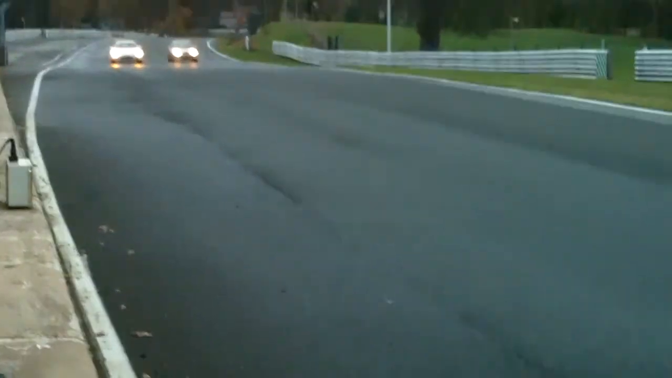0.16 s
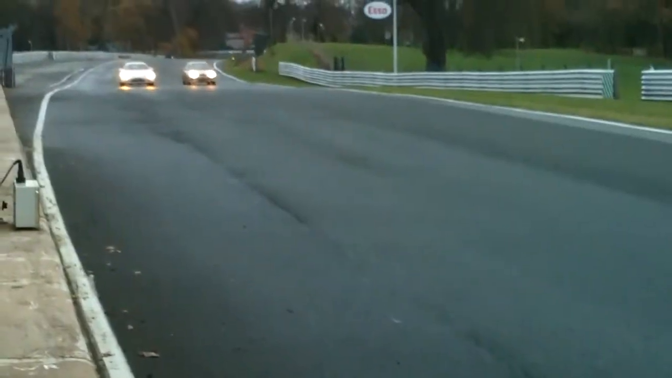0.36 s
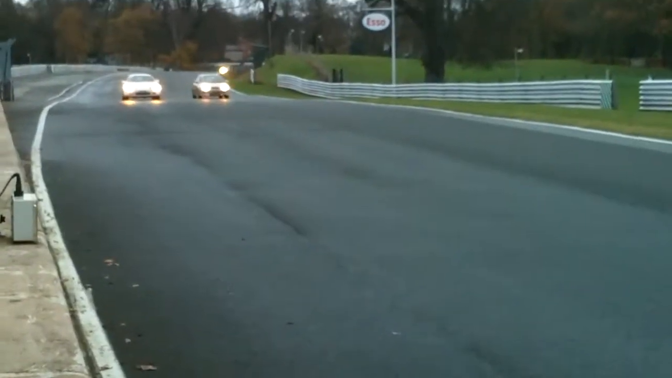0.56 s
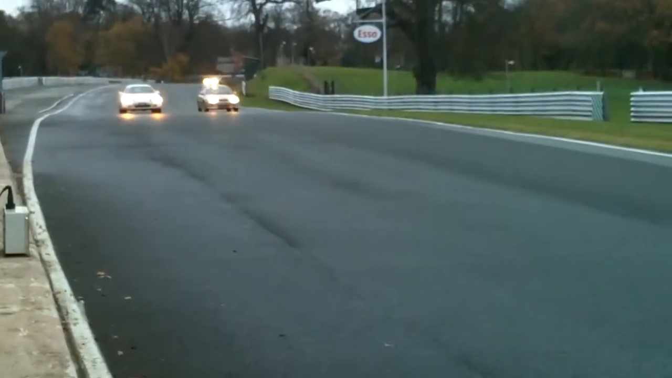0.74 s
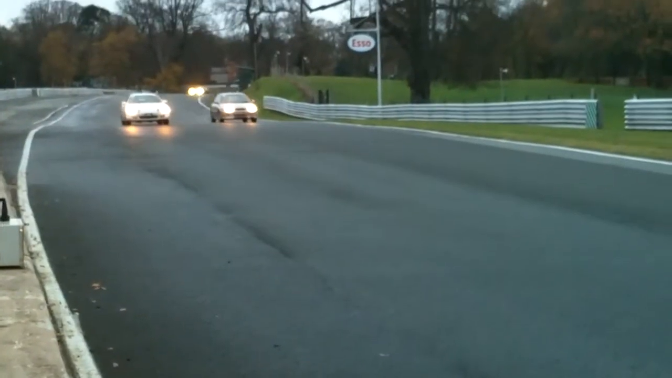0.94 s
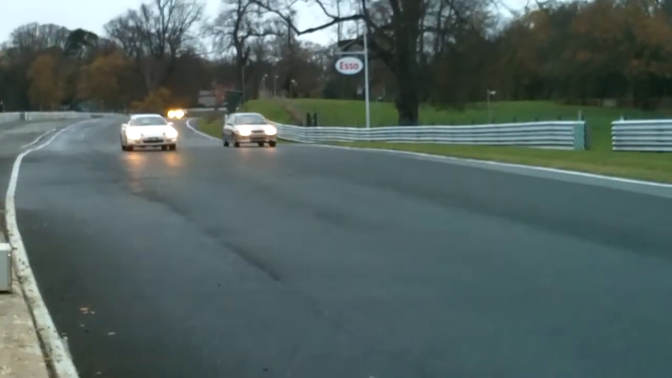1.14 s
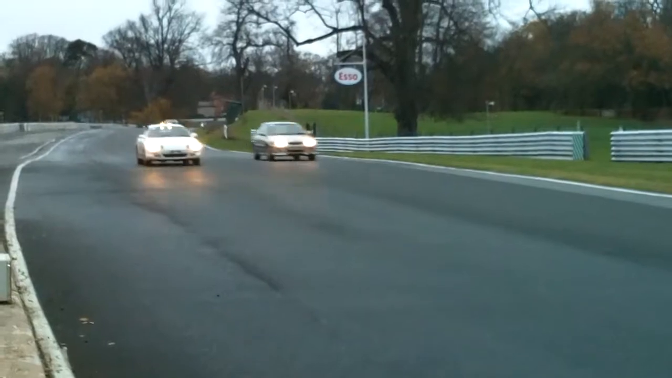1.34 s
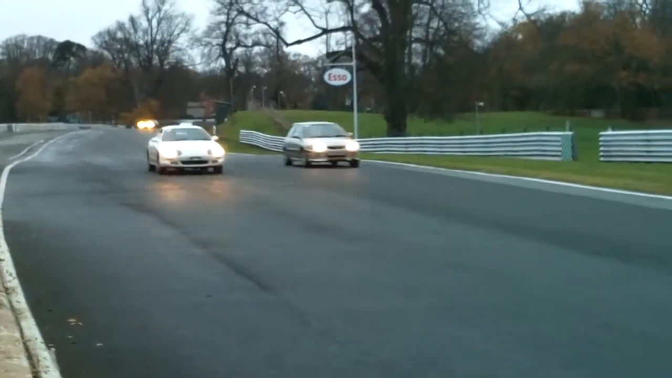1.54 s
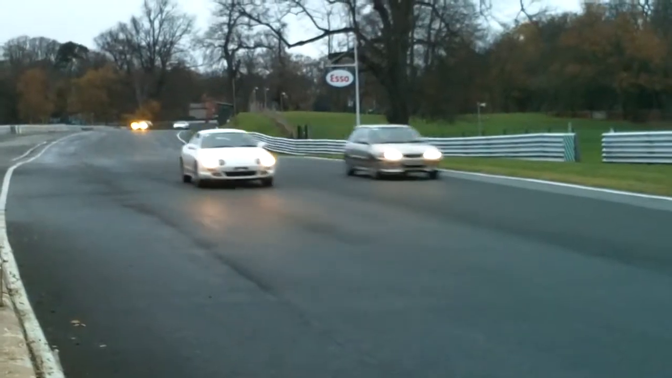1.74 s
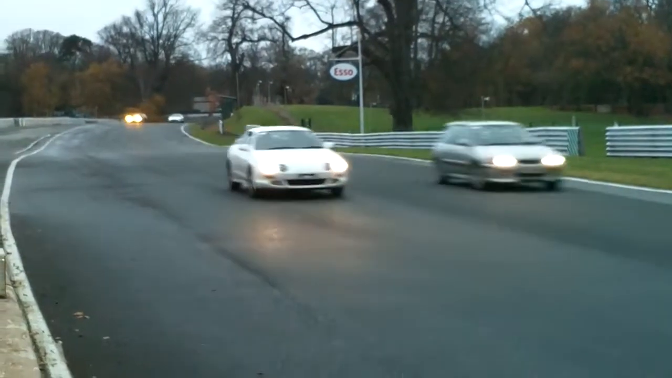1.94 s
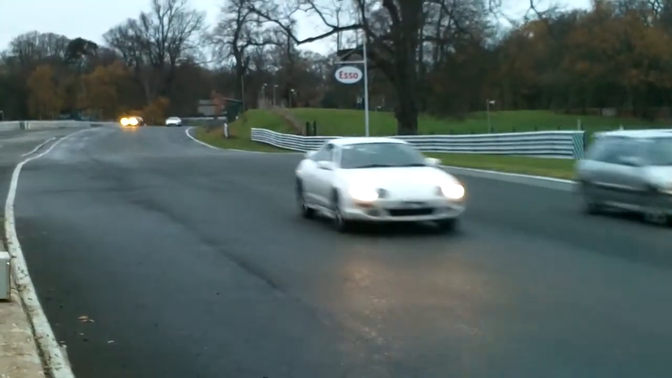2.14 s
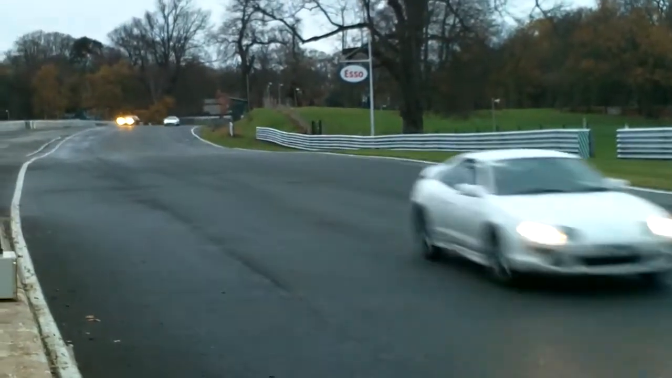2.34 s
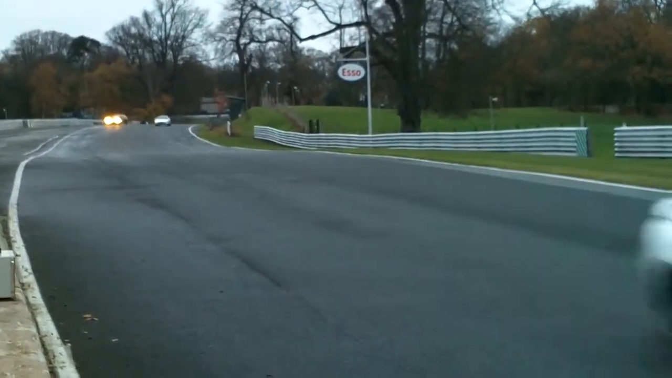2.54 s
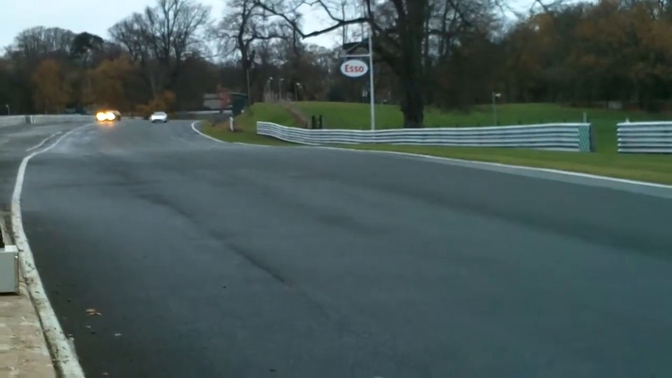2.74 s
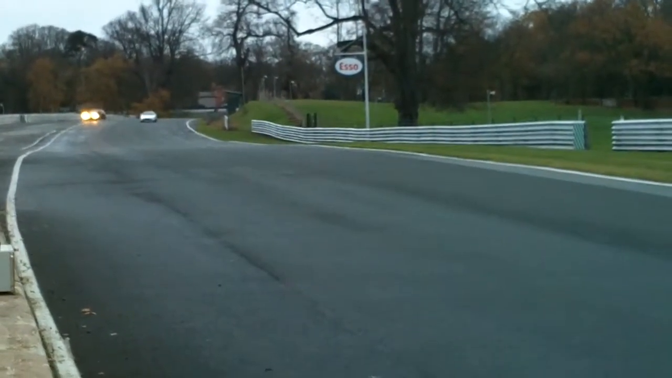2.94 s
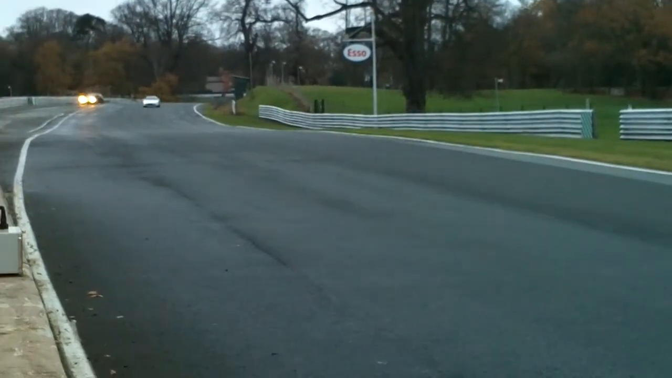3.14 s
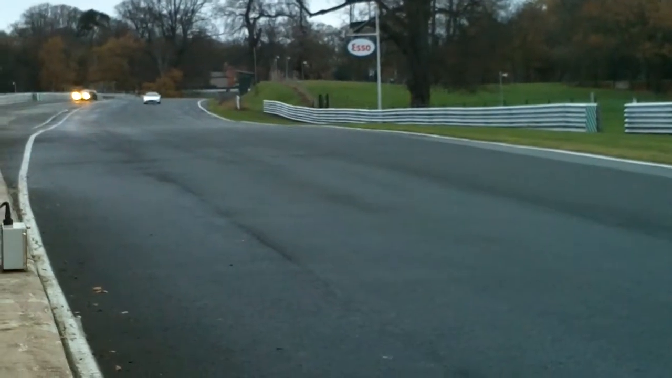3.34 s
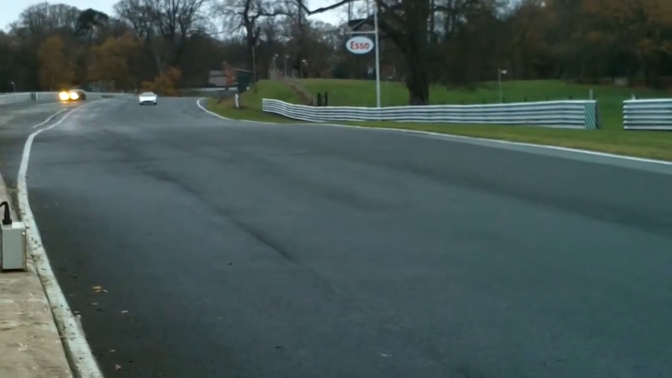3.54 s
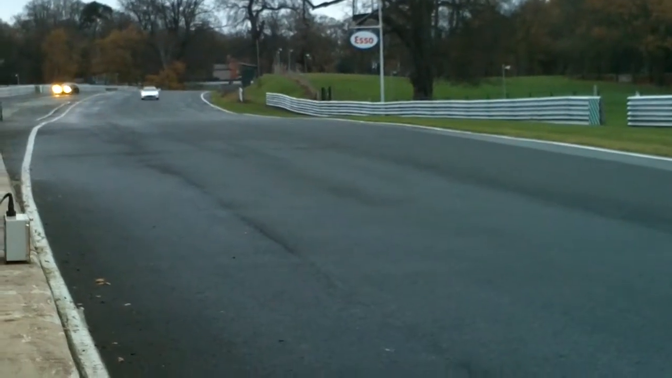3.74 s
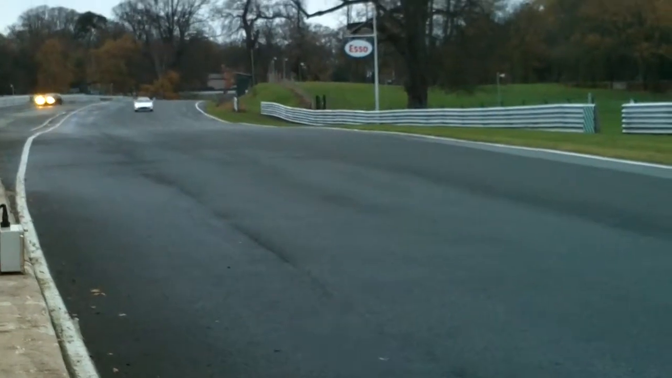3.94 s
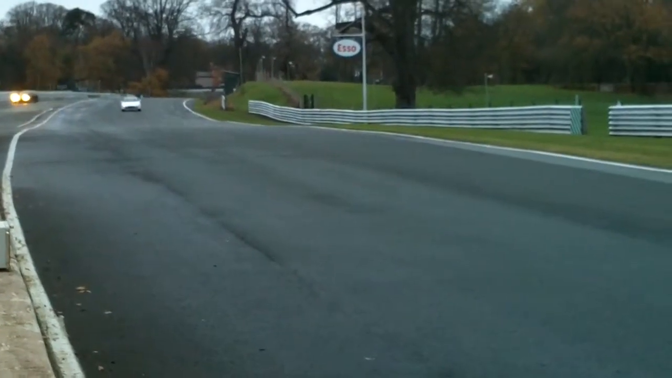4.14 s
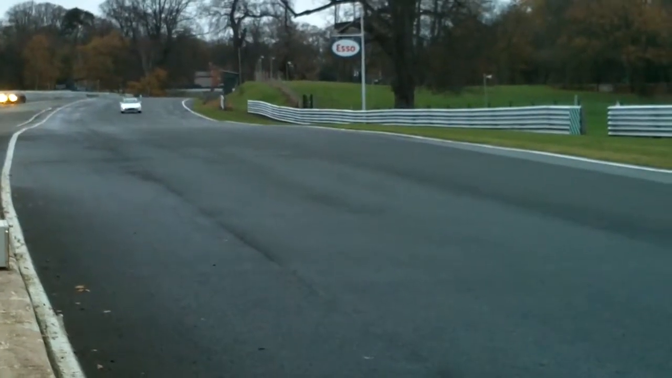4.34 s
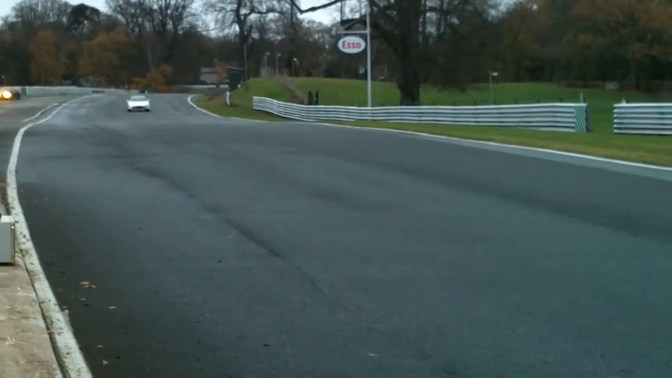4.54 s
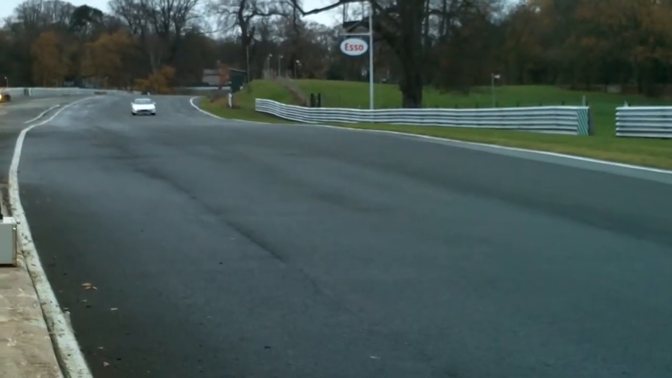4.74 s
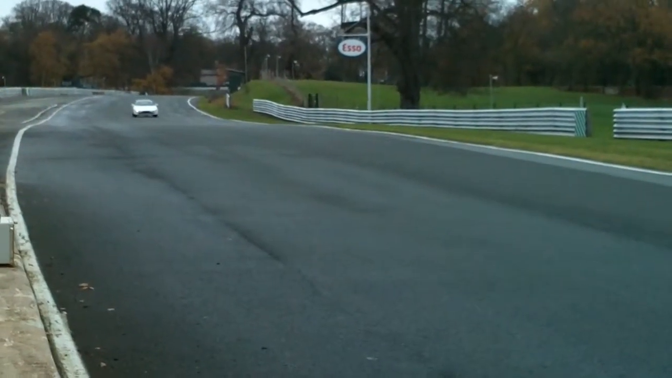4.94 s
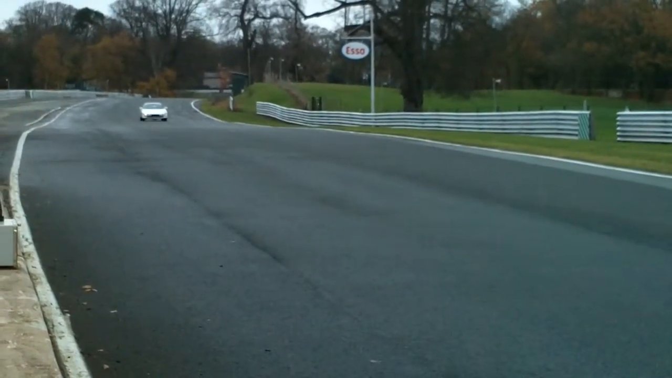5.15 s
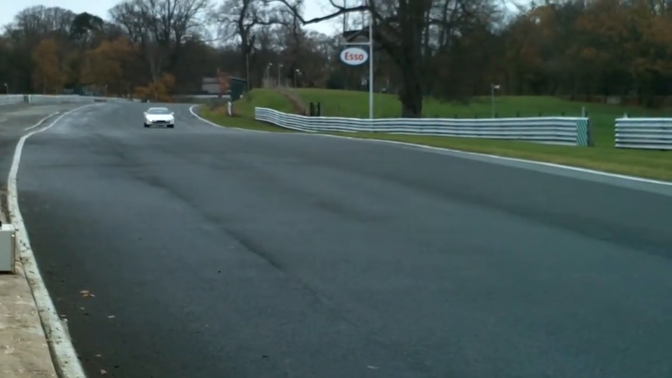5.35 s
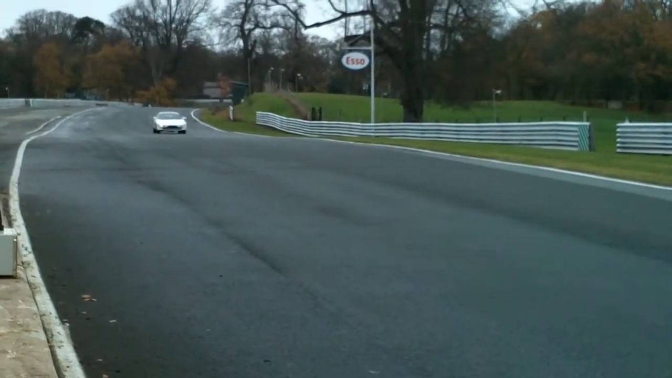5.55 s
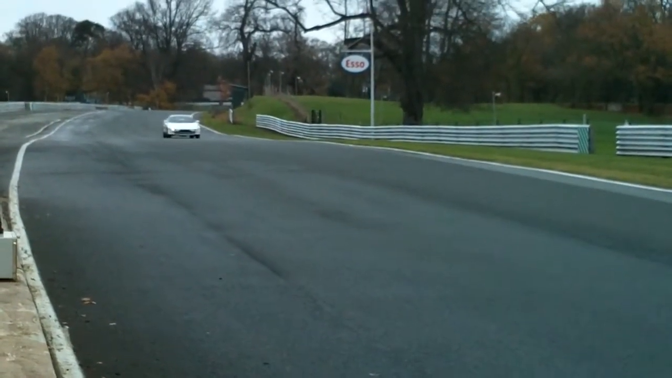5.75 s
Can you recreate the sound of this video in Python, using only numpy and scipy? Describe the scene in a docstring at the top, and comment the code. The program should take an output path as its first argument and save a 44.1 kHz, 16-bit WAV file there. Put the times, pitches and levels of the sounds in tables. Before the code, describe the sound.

Heard from beside a wet circuit, engines drone and grow louder as two cars come up the straight. About halfway they tear past one right after the other, their notes falling, with hissing water and a low puff of air. A throbbing exhaust wavers as they pull away. Much quieter, another car drones far off and a slow one rolls by with a quick rev and a light tyre hiss.

```python
"""Saloon cars on a wet circuit

From the pit wall, a coupe and a hatchback come up the straight side by side, drop in pitch as they pass
and pull away in tyre roar, spray and a puff of air. Others drone round the far bend, and one rolls by in
the pit lane, tyres sizzling. Each engine is a stack of orders, multiples of its four-stroke cycle rate:
order 4 is the firing note, others come from unequal cylinders. Tyres, water and air are shaped noise."""
import sys
import numpy as np
from scipy import signal
from scipy.fft import rfft, irfft, next_fast_len
from scipy.io import wavfile
from scipy.ndimage import uniform_filter1d

SR = 44100
rng = np.random.default_rng(int(sys.argv[2]) if len(sys.argv) > 2 else 0)


def master(y):
    """Save y as 16-bit WAV."""
    cut = np.clip(np.atleast_2d(y).T, -1, 1)
    pcm = np.round(cut * 32767)  # scale
    wavfile.write(sys.argv[1], SR, pcm.astype(np.int16))


N = 255339
TIME = np.arange(N) / SR

# Each pass: moment when nearest in seconds, miss distance over road speed in seconds, Mach number.
COUPE_PASS = (2.838, 0.286, 0.104)
HATCH_PASS = (3.037, 0.164, 0.085)
PIT_PASS = (5.425, 0.34, 0.02)
RACERS = (COUPE_PASS, HATCH_PASS)
# The colour of tread on wet tarmac. Each row: frequency in Hz, level in dB.
TYRE_COLOUR = [(300, -3), (620, -19.5), (800, -4), (1000, -2), (1400, -1), (2000, -2.5), (2600, -12.5),
               (3500, -13.5), (6000, -30.5)]
# The colour of hissing water. Each row: frequency in Hz, level in dB.
HISS_COLOUR = [(1500, -17.5), (2600, -1), (3400, 6), (4600, 4), (5300, -12.5), (6800, -21.5), (8500, -34.5),
               (15000, -46.5)]


def from_db(db):
    """Decibels to gain."""
    return 10 ** (np.asarray(db) / 20)


def unit_power(x):
    """Scale to an rms of one."""
    return x / np.sqrt(np.mean(x ** 2) + 1e-20)


def curves(rows):
    """Breakpoints joined by straight lines: one curve for each column after the time."""
    seconds, *columns = np.transpose(rows)
    return [np.interp(TIME, seconds, column) for column in columns]


def drift(rate):
    """A smooth random wander of spread 1, changing about `rate` times a second."""
    hop = 100
    pole = np.exp(-2 * np.pi * rate * hop / SR)
    slow = signal.lfilter([1], [1, -2 * pole, pole * pole], rng.standard_normal(N // hop + 1002))[1000:]
    return np.interp(np.arange(N) / hop, np.arange(len(slow)), unit_power(slow))


def coloured_noise(spectrum):
    """Noise of unit power with the given colour, falling 24 dB an octave beyond its ends."""
    hz, db = np.transpose(spectrum)
    size = next_fast_len(N)
    octave = np.log2(np.maximum(np.arange(size // 2 + 1) * SR / size, 1))
    beyond = np.abs(octave - np.clip(octave, np.log2(hz[0]), np.log2(hz[-1])))
    gain = from_db(np.interp(octave, np.log2(hz), db) - 24 * beyond)
    return unit_power(irfft(rfft(rng.standard_normal(size)) * gain, size)[:N])


def butterworth(x, order, hz, kind="low"):
    """Low-pass or high-pass filter."""
    return signal.sosfilt(signal.butter(order, hz, kind, fs=SR, output="sos"), x)


def singing_noise(rows, width_hz):
    """Noise in one resonance whose centre glides."""
    centre_hz, level_db = curves(rows)
    wobble = butterworth(rng.standard_normal((2, N)), 2, width_hz / 2)
    phase = 2 * np.pi * np.cumsum(centre_hz) / SR
    return from_db(level_db) * unit_power(wobble[0] * np.cos(phase) + wobble[1] * np.sin(phase))


def bearing(car):
    """Distance as a multiple of the miss distance, and the side turned to us: -1 nose, +1 tail."""
    nearest_s, passing_s, _ = car
    along = (TIME - nearest_s) / passing_s
    distance = np.hypot(1, along)
    return distance, along / distance


def fly_by(*cars, db, falloff, behind_db):
    """Pass-by gain: `db` when nearest, falling as a power of distance, `behind_db` up aft, down ahead."""
    gains = [from_db(db + behind_db * tail) / distance ** falloff
             for distance, tail in map(bearing, cars)]
    return np.sqrt(sum(gain ** 2 for gain in gains))


def doppler(revs, car):
    """Engine speed as heard: raised while the car comes, lowered as it goes."""
    mach, tail = car[2], bearing(car)[1]
    return curves(revs)[0] / (1 + mach * tail)


def crank_angle(speed, unsteady):
    """Phase of the engine cycle; the flywheel smooths the speed, which still hunts a little."""
    speed = uniform_filter1d(speed, size=3000, mode="nearest")
    return 2 * np.pi * np.cumsum(speed * (1 + unsteady * drift(9))) / SR


def partial(phase, rough):
    """One engine order: a direct tone plus a wavering part scattered by ground, barriers and air."""
    scattered = rough * (drift(14) * np.sin(phase) - drift(13.3) * np.cos(phase))
    return np.sqrt(2 / (1 + 2 * rough ** 2)) * (scattered - np.cos(phase))


def order_stack(angle, orders, rough, ground_fade_db=2.5):
    """A set of engine orders; the reflection off the track makes the high ones come and go."""
    stack = 0
    for order, db in orders:
        fading_db = ground_fade_db * min(order / 20, 1) * drift(0.99)
        stack += from_db(db + fading_db) * partial(order * angle + rng.uniform(0, 2 * np.pi), rough)
    return stack


def coupe():
    """A screaming four: intake howl, gear whine up close, then exhaust. Returns sound and crank angle."""
    # It pulls, then slows for the bend. Each row: time in seconds, engine cycles per second.
    revs = [(0, 54.63), (2.3, 59.16), (4.1, 58.18), (5.79, 50.18)]
    # How hard the exhaust sounds. Each row: time in seconds, level in dB.
    effort = [(0, -0.5), (1.8, -3.5), (2.5, 7.5), (2.9, 7.5), (3.1, -25), (3.7, -3), (4.5, 0.5),
              (5.79, 10.5)]
    # The engine's four voices. Each row: order, level in dB.
    drone_orders = [(2, -13.5), (3, 3), (5, -11.5), (6, -10.5), (7, -12), (8, -10.5)]
    rasp_orders = [(9, -32), (10, -27.5), (11, -26.5), (12, -17.5), (15, -7.5), (26, -17.5), (27, -26.5)]
    whine_orders = [(13, 1), (14, -10), (18, -6.5), (20, -10), (21, 5.5), (22, -4.5), (23, -5)]
    exhaust_orders = [(2, -19.5), (3, -20.5), (4, 0.5), (5, -23.5), (6, -13)]
    angle = crank_angle(doppler(revs, COUPE_PASS), unsteady=0.00098)
    head_on = 0.5 + 0.5 * np.tanh((TIME - 1.09) / 0.22)  # out of the bend, its nose swings towards us
    intake = order_stack(angle, drone_orders, rough=0.26)
    intake += head_on * order_stack(angle, rasp_orders, rough=0.27)
    intake *= fly_by(COUPE_PASS, db=-8.5, falloff=1.853, behind_db=-4.5)
    whine = order_stack(angle, whine_orders, rough=0.25)
    whine *= fly_by(COUPE_PASS, db=-12.5, falloff=3.42, behind_db=-7)
    exhaust = from_db(curves(effort)[0]) * order_stack(angle, exhaust_orders, rough=0.4)
    exhaust *= fly_by(COUPE_PASS, db=-1.8, falloff=2.11, behind_db=3.4)
    return intake + whine + exhaust, angle


def hatchback(scatter_per_distance=0.027):
    """A boomy exhaust, sharply pulsed once the tailpipe faces us. Returns sound and crank angle."""
    # It holds speed, brakes and picks up. Each row: time in seconds, engine cycles per second.
    revs = [(0, 37.6), (2.4, 35.24), (3.3, 35.24), (4.1, 35.8), (4.85, 35), (5.3, 29.3), (5.48, 29.8),
            (5.79, 37.2)]
    # How hard the exhaust sounds. Each row: time in seconds, level in dB.
    effort = [(0, 1.5), (.5, 3), (1, -6.5), (1.5, -4.5), (2.1, -9.5), (2.62, 4), (2.95, 3), (3.3, 0.5),
              (4.08, 1.5), (4.2, -6.5), (4.32, -0.5), (4.42, -9), (4.52, -2.5), (4.72, -4.5), (4.95, -0.5),
              (5.3, -8), (5.7, 4.5)]
    # Tailpipe overtones, lined up in phase. Each row: order, level in dB.
    overtones = [(2, -26), (3, -14), (5, -32), (6, -19), (7, -12.5), (8, 0.5), (9, -14.5), (11, -19),
                 (12, -11.5), (13, -19), (14, -34), (15, -29.5), (16, -14.5), (17, -27), (18, -36.5),
                 (19, -25), (20, -21.5), (22, -36), (24, -33.5), (26, -38.5)]
    angle = crank_angle(doppler(revs, HATCH_PASS), unsteady=0.0014)
    distance, _ = bearing(HATCH_PASS)
    boom = partial(4 * angle, rough=scatter_per_distance * distance)
    boom *= fly_by(HATCH_PASS, db=15.97, falloff=1.922, behind_db=2.64)
    tailpipe = 0
    for order, db in overtones:
        tailpipe += from_db(db) * partial(order * angle, rough=0.1 if order % 4 == 0 else 0.4)
    tailpipe *= fly_by(HATCH_PASS, db=6.2, falloff=2.425, behind_db=11.15)
    return from_db(curves(effort)[0]) * (boom + tailpipe + treble_ticks(angle)), angle


def treble_ticks(angle, uneven_db=6, lowest_hz=9000):
    """Faint, uneven high treble ticks in time with the loud low boom."""
    gate = np.cos(2 * angle) ** 60  # opens briefly once in each period of the boom
    fizz = butterworth(rng.standard_normal(N), 4, lowest_hz, "high")
    ticks = unit_power(gate * fizz * from_db(uneven_db * drift(60)))
    return ticks * fly_by(HATCH_PASS, db=-31, falloff=2.43, behind_db=3)


def clatter(angle, lowest_order, highest_order):
    """Valves and intake repeat a jumble every cycle: dense orders whose mix shifts as the car moves."""
    orders = np.arange(1025)
    band = 1 / (1 + (lowest_order / np.maximum(orders, 1)) ** 8) / (1 + (orders / highest_order) ** 6)
    position = angle / (2 * np.pi) % 1
    jumble = 0
    for _ in range(3):
        cycle = irfft(band * np.exp(2j * np.pi * rng.random(len(orders))))
        jumble += drift(1.31) * np.interp(position, np.linspace(0, 1, len(cycle)), cycle)
    return jumble / np.sqrt(uniform_filter1d(jumble ** 2, size=4000) + 1e-20)


def road_roar(coupe_angle, hatch_angle, flutter_db=1.07, far_db=-58):
    """Tread roar and engine clatter swell with each pass over a faint, distant bed."""
    racers = fly_by(*RACERS, db=-3.07, falloff=1.915, behind_db=-1.5)
    pit = fly_by(PIT_PASS, db=-35.5, falloff=2.2, behind_db=2.1)
    swell = np.hypot(racers, np.hypot(pit, from_db(far_db)))
    engines = from_db(-8) * clatter(coupe_angle, lowest_order=13.6, highest_order=36.4)
    engines += from_db(-7) * clatter(hatch_angle, lowest_order=10, highest_order=71)
    flutter = from_db(flutter_db * drift(22))
    tread = from_db(-2) * coloured_noise(TYRE_COLOUR)
    return swell * flutter * (tread + engines)


def exhaust_rush(flutter_db=2.5, far_db=-38.5):
    """Turbulent gas from the hatchback's pipe rises out of the circuit's low background rush."""
    # The dark colour of the gas. Each row: frequency in Hz, level in dB.
    rush_colour = [(60, -11.5), (110, 6.5), (170, 6.5), (240, -1.5), (320, 0), (450, -5.5), (620, -9.5),
                   (1200, -24.5)]
    swell = np.hypot(fly_by(HATCH_PASS, db=5.7, falloff=2.01, behind_db=1.7), from_db(far_db))
    return swell * from_db(flutter_db * drift(10)) * coloured_noise(rush_colour)


def spray(flutter_db=0.97, split_hz=5300, far_mist_db=-74.5):
    """Wet tyres hiss from far off; the finest mist stands out only close by."""
    # The airy top of the mist. Each row: frequency in Hz, level in dB.
    mist_colour = [(3000, -14), (4800, 18), (6500, 10.5), (8500, 4), (10000, 2.5), (11800, -2), (13000, -9),
                   (14300, -11), (15500, -8.5)]
    racer_hiss = fly_by(*RACERS, db=-13.5, falloff=2.12, behind_db=-4)
    racer_mist = fly_by(*RACERS, db=-12.5, falloff=3.12, behind_db=-3)
    pit_hiss = fly_by(PIT_PASS, db=-40.5, falloff=2.9, behind_db=4)
    pit_mist = fly_by(PIT_PASS, db=-40, falloff=6.1, behind_db=-1)
    top_db = 1.5 + 13.5 * bearing(HATCH_PASS)[1]  # spray flies backwards, so it is brighter from behind
    body = butterworth(coloured_noise(HISS_COLOUR), 10, split_hz)
    top = butterworth(coloured_noise(HISS_COLOUR), 10, split_hz, "high")
    hiss = np.hypot(racer_hiss, pit_hiss) * (body + from_db(top_db) * top)
    mist = np.hypot(racer_mist, np.hypot(pit_mist, from_db(far_mist_db))) * coloured_noise(mist_colour)
    return (hiss + mist) * from_db(flutter_db * drift(25))


def buffeting(breeze_db=-39):
    """A low breeze swells in the wake of the two racers."""
    # The rumble of moving air. Each row: frequency in Hz, level in dB.
    air_colour = [(20, -7.5), (35, 1), (50, -1.5), (68, 4.5), (90, -11), (150, -10), (300, -17)]
    wake = fly_by(*RACERS, db=-5.5, falloff=2.8, behind_db=4.7)
    return np.hypot(wake, from_db(breeze_db)) * coloured_noise(air_colour)


def muffled_engine(drive, orders):
    """Far off or behind the wall only an engine's low orders are left, wavering in the air."""
    speed, level_db = curves(drive)
    angle = crank_angle(speed, unsteady=0.0019)
    tones = 0
    for order, db in orders:
        tones += from_db(db) * partial(order * angle + rng.uniform(0, 2 * np.pi), rough=0.3)
    return from_db(level_db) * tones


def far_cars():
    """Three distant engines drone and rev, and one thin note carries for a moment."""
    # One leaves the far bend, one comes up the straight, one revs through a gear.
    # Each row: time in seconds, engine cycles per second, level in dB.
    chaser = [(0, 51.3, -39), (.6, 51, -37.5), (1.1, 56, -33.5), (1.5, 55.2, -39), (1.9, 62, -40),
              (2.4, 74, -19), (3, 58, -49)]
    next_car = [(4.2, 45, -53), (4.7, 53.5, -50.5), (4.951, 54.3, -28.5), (5.25, 53, -29), (5.399, 54, -25),
                (5.602, 57.7, -28.5), (5.79, 53, -30)]
    revver = [(.5, 52, -49), (.75, 76, -48), (1, 72, -39), (1.25, 79.4, -33), (1.45, 82, -37),
              (1.799, 74, -44), (2.1, 82.5, -67)]
    # What carries of a distant engine. Each row: order, level in dB.
    far_orders = [(1, -11), (2, -6), (3, -8), (4, 2.5), (5, -27.5), (6, -16.5), (8, -18)]
    # The lone engine note. Each row: time in seconds, pitch in Hz, level in dB.
    far_note = [(.2, 388, -79), (.45, 395.6, -41), (.62, 407, -43), (.9, 398, -72)]
    engines = sum(muffled_engine(drive, far_orders) for drive in (chaser, next_car, revver))
    return engines + singing_noise(far_note, width_hz=4.2)


def tread_howl():
    """The tyres of the departing cars sing as they load up for the bend."""
    # The howl's glide. Each row: time in seconds, centre in Hz, level in dB.
    glide = [(2.5, 1200, -74), (2.95, 1200, -6), (3.3, 1200, -15), (3.7, 1580, -33.5), (4.2, 1650, -36.5),
             (4.55, 1750, -34.5), (5, 1650, -47), (5.79, 1650, -45)]
    return singing_noise(glide, width_hz=420)


def puddles():
    """Tyres hit standing water: each puddle is a short slap with a hiss on top."""
    # Each row: peak time in seconds, level in dB, half length in seconds, slap against hiss in dB.
    splashes = [(2.866, -4, 0.028, 7), (3.797, -33, 0.023, -4), (4.003, -34, 0.048, 11),
                (4.19, -44, 0.099, 6), (5.519, -33.5, 0.047, -7)]
    slap, hiss = coloured_noise(TYRE_COLOUR), coloured_noise(HISS_COLOUR)
    water = 0
    for peak_s, db, half_s, slap_db in splashes:
        envelope = from_db(db) * np.exp(-((TIME - peak_s) / half_s) ** 2)
        water += envelope * (hiss + from_db(slap_db) * slap)
    return water


def pit_lane_car(flicker_db=2.8):
    """A slow car behind the wall lifts, then blips its throttle, its wet tyres sizzling."""
    # The throttle work. Each row: time in seconds, engine cycles per second, level in dB.
    drive = [(3.8, 19, -50), (4.3, 14.8, -45), (4.8, 15, -38.5), (5.15, 16.7, -32), (5.24, 11.3, -40),
             (5.46, 17, -15.5), (5.52, 17, -20.5), (5.6, 14, -43), (5.79, 32, -35)]
    # Its exhaust note. Each row: order, level in dB.
    exhaust_orders = [(4, -1), (8, 0), (12, -19.5), (16, -31)]
    # The tyre sizzle. Each row: time in seconds, centre in Hz, level in dB.
    sizzle_glide = [(5, 5037, -77), (5.17, 5010, -43.5), (5.4, 4890, -42), (5.5, 5940, -48),
                    (5.63, 6450, -51), (5.79, 6300, -61)]
    sizzle = singing_noise(sizzle_glide, width_hz=800)
    return muffled_engine(drive, exhaust_orders) + sizzle * from_db(flicker_db * drift(17))


def scene(pulse_depth=0.082):
    """All the cars, the wet track and the air, in mono."""
    howl, coupe_angle = coupe()
    boom, hatch_angle = hatchback()
    cars = howl + boom + far_cars() + pit_lane_car()
    pulsing = 1 + pulse_depth * np.cos(4 * hatch_angle)  # a throb at the hatchback's firing rate
    roar = (road_roar(coupe_angle, hatch_angle) + exhaust_rush()) * pulsing
    return (cars + roar + tread_howl() + spray() + puddles() + buffeting())[None, :]


def record(dry, hold_db=-16.5, averaging_s=0.063, cutoff_hz=15300):
    """The microphone notches a few bands, a gain control ducks the loud passes, and the top is cut."""
    # Dips in the microphone's response. Each row: centre in Hz, width in Hz.
    mic_dips = [(2730, 570), (5500, 1130), (7900, 2600), (10950, 920)]
    for hz, width_hz in mic_dips:
        dry = signal.lfilter(*signal.iirnotch(hz, hz / width_hz, fs=SR), dry)
    window = int(averaging_s * SR)
    power = uniform_filter1d(uniform_filter1d(dry ** 2, size=window), size=window)
    ducked = dry / np.sqrt(np.hypot(1, power / from_db(hold_db) ** 2))
    return signal.sosfilt(signal.ellip(12, 0.1, 90, cutoff_hz, fs=SR, output="sos"), ducked)


dry = scene()
out = record(dry)
master(out)
```